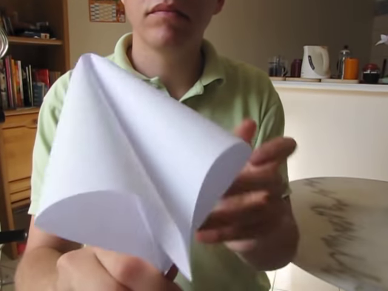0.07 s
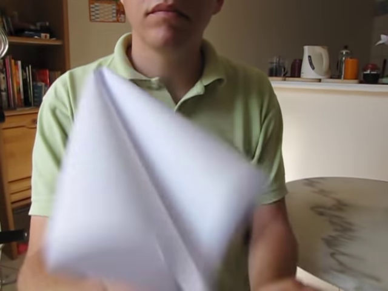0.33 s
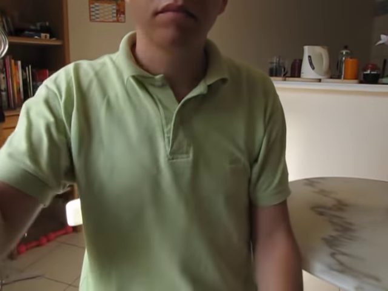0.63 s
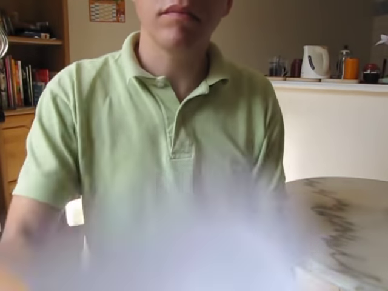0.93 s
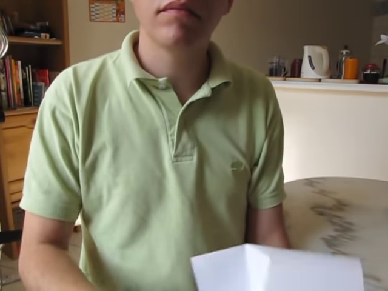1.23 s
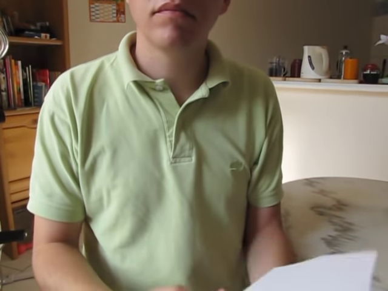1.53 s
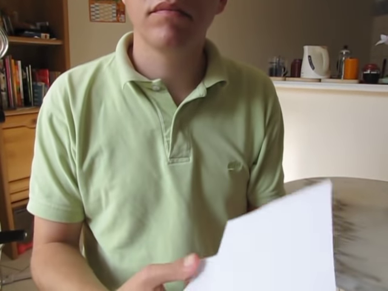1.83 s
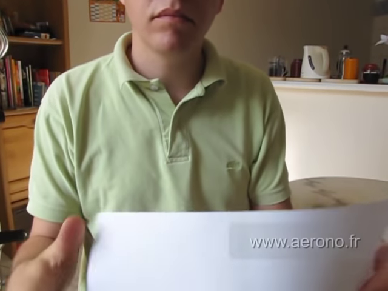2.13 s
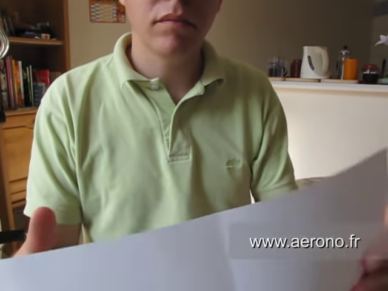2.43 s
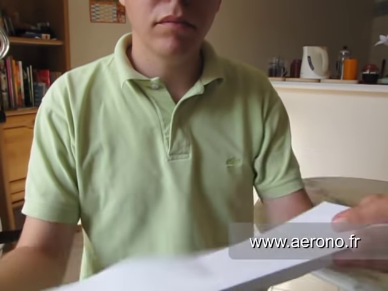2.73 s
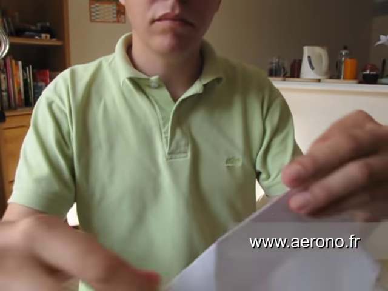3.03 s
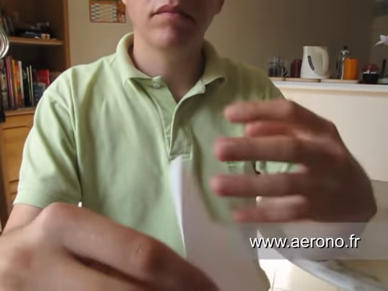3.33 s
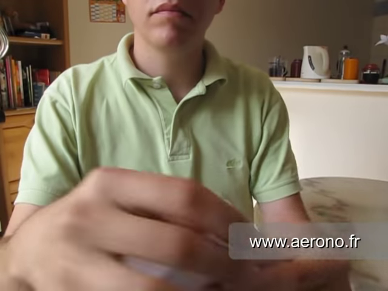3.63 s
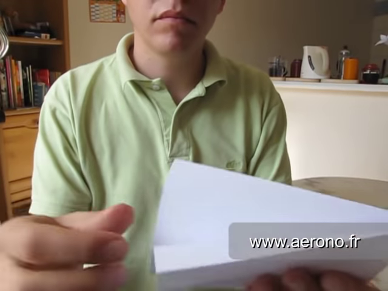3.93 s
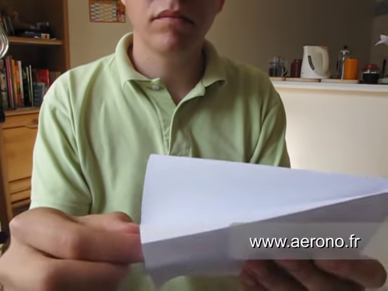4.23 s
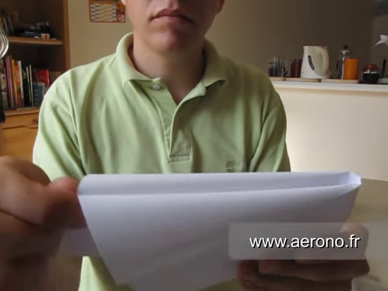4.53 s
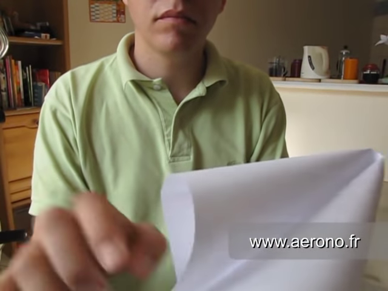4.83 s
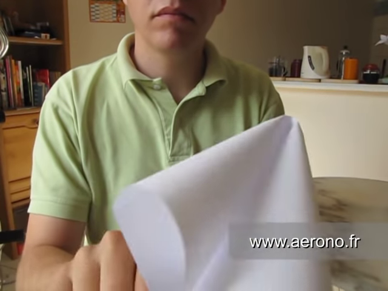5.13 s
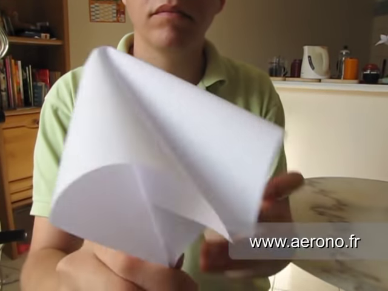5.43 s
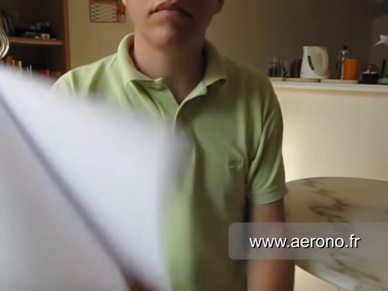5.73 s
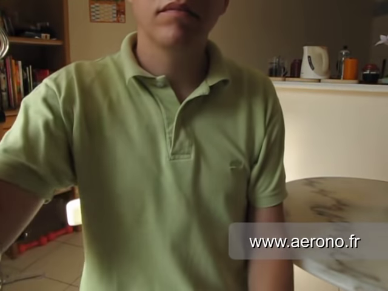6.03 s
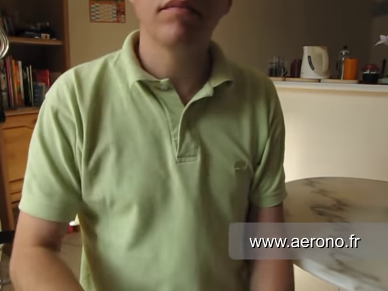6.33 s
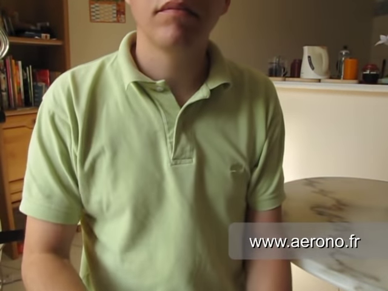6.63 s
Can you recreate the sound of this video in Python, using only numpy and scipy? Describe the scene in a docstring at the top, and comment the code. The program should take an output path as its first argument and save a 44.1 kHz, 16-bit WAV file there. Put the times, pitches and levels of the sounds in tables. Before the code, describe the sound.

Faint hiss and a low, wavering drone fill a living room. At about 0.7 seconds a swinging arm pushes a soft rumble of air at the close microphone, and at 0.9 a folded paper banger cracks open with a loud, slightly overloaded bang that rings briefly. Two crisp crease snaps follow near 1.1. From 1.4 to 3.3 seconds the sheet is quietly handled, with scattered clicks, short rustles and a more distinct snap at 2.0. Paper slides softly on paper around 3.6 and 4.4, and more small snaps, crinkles and low puffs come between 4.4 and 5.4 as the fold is tucked back in. After a lull, another faint draught at 6.0 leads into a second sharp, slightly fuller bang at 6.2. A tiny crinkle follows near 6.7. The sound is a little dull, with quiet tails cut short.

```python
"""A folded paper banger is swung down twice in a living room and cracks open, overloading a small camera.
The swinging arm pushes a draught; the inner fold rushes out, cracks taut and sets the room ringing.
Between the bangs the sheet is picked up, flexed and tucked back in: creases snap, tiny buckles rustle,
the loose sheet billows and paper slides on paper. The camera's noise suppressor holds down the room's
hiss and low, wavering drone and cuts the quiet tails short."""
import sys
import numpy as np
from scipy import signal
from scipy.fft import rfft, irfft, next_fast_len
from scipy.io import wavfile
from scipy.ndimage import uniform_filter1d

SR = 44100
rng = np.random.default_rng(int(sys.argv[2]) if len(sys.argv) > 2 else 0)


def log_audio(samples):
    """Write samples as a 16-bit WAV file to the path given in sys.argv[1]."""
    # one column per channel
    frames = np.atleast_2d(samples).T
    # limit to full scale, then quantise
    limited = np.clip(frames, -1, 1)
    pcm = np.round(limited * 32767).astype(np.int16)
    wavfile.write(sys.argv[1], SR, pcm)


N = 299439

# how long the room rings: (frequency [Hz], t60 [s])
ROOM_T60 = [(60, 0.19), (200, 0.36), (700, 0.46), (1400, 0.51), (3000, 0.47), (6000, 0.44), (10000, 0.28)]
# colour of the room hiss: (frequency [Hz], level [dB])
HISS_EQ = [(20, 1), (100, -4.5), (130, -8), (175, -7), (230, -1), (330, -7), (520, -1), (620, -3.5),
           (810, 1), (1200, -2), (1750, 2.5), (2150, -5.5), (4000, -10.5), (8000, -8), (12000, -25)]
# low drone of the room: (frequency [Hz], level [dB])
DRONE_TONES = [(64.6, -62), (91.5, -56)]
# the hands bend the sheet: (time [s], length [s], level [dB])
FLEXES = [(0.0, 0.0068, -33.5), (2.004, 0.021, -37.5), (2.766, .03, -36), (2.813, 0.037, -36.5),
          (3.125, .095, -34), (3.235, .07, -36.5), (4.671, .045, -36.5), (5.268, 0.033, -37),
          (5.319, 0.027, -36.5)]
# colour of a bending sheet: (frequency [Hz], level [dB])
BEND_EQ = [(40, -15), (200, -0.5), (500, 5), (800, 4), (1100, 4), (1480, 6.5), (2100, -2), (3200, -9),
           (4300, -19.5), (5500, -21.5), (9000, -23.5)]
# arm swings: (time [s], length [s], level [dB])
DRAUGHTS = [(.66, 0.2, -47), (1.46, 0.19, -47), (5.98, 0.28, -50.5)]
# rumble of air on the microphone: (frequency [Hz], level [dB])
DRAUGHT_EQ = [(15, 5.5), (38, 2.5), (70, -9), (200, -28.5), (800, -65)]
# the bangs: (time [s], level [dB], bass gain [dB], rush level [dB], rush length [s])
BANGS = [(0.942, 4.5, -0.5, -23, 0.026), (6.2119, 4, 2, -18, 0.04)]
# colour of the burst of air from the fold: (frequency [Hz], level [dB])
BURST_EQ = [(30, -26), (100, -16.5), (200, -11), (400, -3.5), (800, 1), (1250, -1.5), (1600, -8),
            (1950, -16.5), (2700, -12.5), (4200, -15.5), (6300, -21), (9000, -22)]
# what a bang sets ringing in the room: (frequency [Hz], level [dB], t60 [s])
ROOM_MODES = [(88, -30, 0.67), (118, -31, .55), (188.7, -22, 0.5), (237.7, -41.5, 3.5), (304.4, -22, 0.27),
              (365, -17.5, 0.59), (445, -12.5, .6), (584, -17.5, 0.39), (727, -23.5, 0.81),
              (857, -9.5, 0.25), (858, -15, 0.23), (978, -17, 0.18), (1054, -13, 0.58), (1173, -4.5, 0.5),
              (1267, -13, 0.25), (1475, -17, 0.63)]
# a crease snaps through: (time [s], level [dB], crispness [dB])
SNAPS = [(1.067, -24, 12.5), (1.107, -20.5, 13.5), (1.408, -27.5, 4.5), (1.451, -31, 14),
         (1.585, -31.5, 3.5), (1.593, -29, -12.5), (1.818, -32.5, -2), (1.942, -36, 7), (1.9924, -31, 1.5),
         (2.030, -21.5, 0), (2.937, -38, -6), (3.108, -35.5, -2), (3.127, -32.5, 7.5), (3.246, -30.5, -1),
         (4.409, -38.5, 2), (4.501, -36.5, 0), (4.681, -33, -12.5), (4.7462, -26, -15.5), (5.2278, -33, 7),
         (5.2655, -31, -2.5), (5.3262, -41, -6)]
# the sheet's colour in a snap: (frequency [Hz], level [dB])
SNAP_EQ = [(40, -5), (130, -4), (280, 2.5), (500, 0.5), (900, 2), (1150, -4.5), (1450, 0), (1700, -5),
           (2050, -5), (2900, -2.5), (4200, -9), (6000, -8.5), (9000, -11)]
# hollow knock of the curved sheet: (frequency [Hz], level [dB], t60 [s])
SHEET_MODES = [(1397, -9, 0.13), (1492, -9.5, 0.17)]
# the held sheet stirs: (time [s], length [s], level [dB])
STIRS = [(1.401, 0.18, -44.5), (2.15, .4, -47.5), (2.657, 0.26, -43), (4.392, 0.2, -46), (6.66, 0.089, -45)]
# the loose sheet billows: (time [s], level [dB])
BILLOWS = [(1.587, -41), (5.264, -35.5), (5.325, -37.5)]
# colour of its puff of air: (frequency [Hz], level [dB])
PUFF_EQ = [(40, -15.5), (170, 1), (300, -13), (650, 1.5), (1500, -41.5)]
# paper slides on paper: (time [s], length [s], level [dB])
SLIDES = [(1.85, .14, -45), (2.6, .34, -45.5), (3.53, 0.32, -45), (4.23, 0.43, -40.5)]
# colour of that rub: (frequency [Hz], level [dB])
SLIDE_EQ = [(300, -8), (1500, 11.5), (3500, 2.5), (6500, -1.5), (9000, -12)]
# how far the suppressor ducks a quiet band: (frequency [Hz], cut [dB])
SUPPRESSION = [(100, 5), (300, 8), (1000, 12), (2500, 15), (4000, 15), (6000, 20)]
# the camera microphone's dull top end: (frequency [Hz], gain [dB])
CAMERA_EQ = [(20, 0), (6000, -3), (6700, -4.5), (7400, -13), (8200, -27.5), (10000, -48.5), (16000, -61.5)]

USUAL_SNAP_DB, USUAL_BUCKLE_DB = -30.5, -35.5  # cue levels of an ordinary snap and run of buckles


def amp(db):
    """Decibels to gain."""
    return 10 ** (np.asarray(db) / 20)


def unit_rms(x):
    """Scales to an rms of one."""
    return x / np.sqrt(np.mean(x ** 2) + 1e-20)


def curve_at(points, hz):
    """Reads a table on a log-frequency axis."""
    f, value = np.transpose(points)
    return np.interp(np.log(hz + 1), np.log(f + 1), value)


def add(mix, s, sound):
    """Mixes a sound in at a time."""
    part = mix[max(round(s * SR), 0):][:len(sound)]
    part += sound[:len(part)]


def seconds(length):
    """A time axis."""
    return np.arange(int(length * SR)) / SR


def colour(x, eq, size=8192):
    """Minimum-phase EQ: shapes the tone with no ringing ahead of an attack."""
    hz = np.abs(np.fft.fftfreq(size, 1 / SR))
    log_gain = np.log(amp(curve_at(eq, hz)))
    spectrum = np.exp(np.conj(signal.hilbert(log_gain)))
    pulse = np.fft.ifft(spectrum).real[:size // 2]
    return signal.oaconvolve(x, pulse)[:len(x)]


def noise(eq, length):
    """Coloured noise with an rms of one."""
    return unit_rms(colour(rng.standard_normal(int(length * SR)), eq))


def room_tone(hiss_db=-42.0, waver_rad=0.53):
    """A bed of steady hiss and the low, wavering drone of the room."""
    t = np.arange(N) / SR
    knots = np.linspace(0, t[-1], num=80)
    out = amp(hiss_db) * unit_rms(colour(rng.standard_normal(N), HISS_EQ))
    for hz, db in DRONE_TONES:
        drift = waver_rad * np.interp(t, knots, rng.standard_normal(len(knots)))
        out += amp(db) * unit_rms(np.sin(2 * np.pi * hz * t + drift))
    return out


def buckles(db, effort, per_s=2600):
    """Tiny buckles tap the sheet as hard as the effort curve says; a stronger run is crisper."""
    chance, sign = rng.random((2, len(effort)))
    clicks = (chance < per_s / SR) * np.sign(sign - .5) * effort
    rustle = colour(np.pad(clicks, (0, SR // 50)), BEND_EQ)
    crisp_db = 0.7 + 0.82 * (db - USUAL_BUCKLE_DB)
    edge_db = crisp_db + 3  # the papery edge
    tone = [(450, -2), (1600, 0.0069), (3000, crisp_db), (4500, edge_db), (6000, crisp_db)]
    return amp(db) * unit_rms(colour(rustle, tone))


def flexes():
    """The hands bend the sheet and it buckles in short rustles."""
    out = np.zeros(N)
    for s, length, db in FLEXES:
        add(out, s, buckles(db, signal.windows.tukey(int(length * SR), 0.33)))
    return out


def room_tail(size=256):
    """Dense reflections of unit energy, each band dying at its own speed."""
    hz, t, bands = signal.stft(rng.choice([-1., 1.], SR), SR, nperseg=size)
    decay = amp(-60 * t / curve_at(ROOM_T60, hz)[:, None])
    tail = signal.istft(bands * decay, SR, nperseg=size)[1][:SR]
    return tail / np.linalg.norm(tail)


def in_room(x, wet_db=1):
    """Blends in the room's reflections at constant power."""
    reflections = amp(wet_db) * signal.oaconvolve(x, room_tail())[:N]
    return (x + reflections) / np.hypot(1, amp(wet_db))


def swells(cues, eq):
    """Coloured noise that fades smoothly in and out on each cue."""
    out = np.zeros(N)
    for s, length, db in cues:
        wash = noise(eq, length)
        add(out, s, amp(db) * wash * np.hanning(len(wash)))
    return out


def draughts():
    """The swinging arm pushes air at the microphone: a low rumble."""
    return swells(DRAUGHTS, DRAUGHT_EQ)


def crack(decay_s, room_db):
    """The brief flutter of a jolted sheet, and the room's answer."""
    tail = room_tail()
    flutter = rng.choice([-1., 1.], len(tail)) * np.exp(-np.arange(len(tail)) / SR / decay_s)
    return flutter / np.linalg.norm(flutter) + amp(room_db) * tail


def bangs(onset_s=0.054):
    """The inner fold rushes out, cracks taut and sets the room ringing."""
    out, t = np.zeros(N), seconds(1)
    for s, db, bass_db, rush_db, rush_s in BANGS:
        rush = unit_rms(colour(noise(BEND_EQ, rush_s), [(1800, -9.0), (5000, -8.5)]))
        add(out, s - rush_s, amp(rush_db) * rush * np.linspace(0, 1, len(rush)) ** 3)
        blast = colour(crack(decay_s=.02, room_db=3.5), BURST_EQ)
        blast = amp(db) * blast / np.std(blast[:int(onset_s * SR)])
        ring = sum(amp(mode_db - 60 * t / t60) * np.sin(2 * np.pi * (hz * t + rng.random()))
                   for hz, mode_db, t60 in ROOM_MODES)
        add(out, s, colour(blast + ring, [(280, bass_db), (700, 0.0036)]))
    return out


def snaps(crack_gain_db=37, knock_gain_db=1.5, lifted_s=1.9):
    """Creases pop through and knock the sheet; hard ones bite, soft ones flap."""
    out, t = np.zeros(N), seconds(.5)
    for s, db, crisp_db in SNAPS:
        force_db = db - USUAL_SNAP_DB
        flap_db = -7.5 - 0.5 * force_db
        bite_db = -7.5 + 0.38 * force_db + 0.25 * crisp_db
        if s < lifted_s:
            bite_db -= 4.5  # duller while the sheet is held low, beneath the camera
        tick_db = -18 + crisp_db
        tone = [(800, flap_db), (1200, 0), (1800, 0.013),
                (2400, bite_db), (4600, bite_db), (5700, tick_db)]
        pop = crack(decay_s=.007, room_db=-1)[:len(t)]
        snap = colour(colour(pop, SNAP_EQ), tone)
        tuning = 1 + 0.04 * rng.uniform(-1.1, 1)  # the sheet is curved differently each time
        knock = sum(amp(mode_db - 60 * t / t60) * np.sin(2 * np.pi * hz * tuning * t)
                    for hz, mode_db, t60 in SHEET_MODES)
        add(out, s, amp(db) * (amp(crack_gain_db) * snap + amp(knock_gain_db) * knock))
    return out


def settling(length_s=.05):
    """After each snap the sheet settles in a dying run of buckles, louder after a harder snap."""
    out = np.zeros(N)
    fade = 1 - seconds(length_s) / length_s
    for s, snap_db, _ in SNAPS:
        db = -42.5 + 0.9 * (snap_db - USUAL_SNAP_DB)
        add(out, s, buckles(db, fade))
    return out


def stirs(jolts_per_s=23, depth_db=7.5):
    """The held sheet stirs in a faint, wavering crinkle."""
    out = np.zeros(N)
    for s, length, db in STIRS:
        t, jolts = seconds(length), rng.uniform(-1, 1, size=100)
        waver = amp(depth_db * np.interp(t * jolts_per_s, np.arange(len(jolts)), jolts))
        add(out, s, buckles(db, waver * signal.windows.tukey(len(t), 0.33)))
    return out


def billows(length_s=0.052):
    """The loose sheet pushes out soft, low puffs of air that start at once and fade."""
    out = np.zeros(N)
    fade = 1 - seconds(length_s) / length_s
    for s, db in BILLOWS:
        add(out, s, amp(db) * noise(PUFF_EQ, length_s) * fade)
    return out


def slides():
    """Paper rubs over paper with a soft hiss."""
    return swells(SLIDES, SLIDE_EQ)


def scene():
    """All sources at the one microphone."""
    hits = bangs() + snaps()
    rustles = in_room(flexes() + settling() + stirs())
    return (hits + rustles + billows() + slides() + draughts() + room_tone())[None]


def suppress(x, size=384, hold=.55, threshold_db=6, knee_db=1.4):
    """A multiband gate ducks whatever is near its own noise floor; it opens fast, lets go more slowly."""
    hz, _, bands = signal.stft(x, SR, nperseg=size)
    power = uniform_filter1d(abs(bands) ** 2, size=9, axis=0)
    held_power = signal.lfilter([1 - hold], [1, -hold], power)
    level_db = 10 * np.log10(abs(held_power) + 1e-20)
    over_floor_db = level_db - np.median(level_db, axis=1, keepdims=True)
    shut = .5 - .5 * np.tanh((over_floor_db - threshold_db) / (2 * knee_db))
    cut_db = curve_at(SUPPRESSION, hz)[:, None] * shut
    return signal.istft(bands * amp(-cut_db), SR, nperseg=size)[1][:N]


def record(dry, clip_db=-4.5, ceiling_db=-6.5, hardness=8, cutoff_hz=15800):
    """The camera chain: input overload, noise suppressor, dull microphone EQ, soft ceiling, low-pass."""
    clipped = np.clip(dry[0], -amp(clip_db), amp(clip_db))
    gated = suppress(clipped)
    size = next_fast_len(N)
    hz = np.fft.rfftfreq(size, 1 / SR)
    voiced = irfft(rfft(gated, size) * amp(curve_at(CAMERA_EQ, hz)), size)[:N]
    rounded = voiced / (1 + abs(voiced / amp(ceiling_db)) ** hardness) ** (1 / hardness)
    lowpass = signal.firwin(511, cutoff_hz, window=("kaiser", 9), fs=SR)
    return signal.oaconvolve(rounded[None], lowpass[None], "same")


dry = scene()
out = record(dry)
log_audio(out)
```